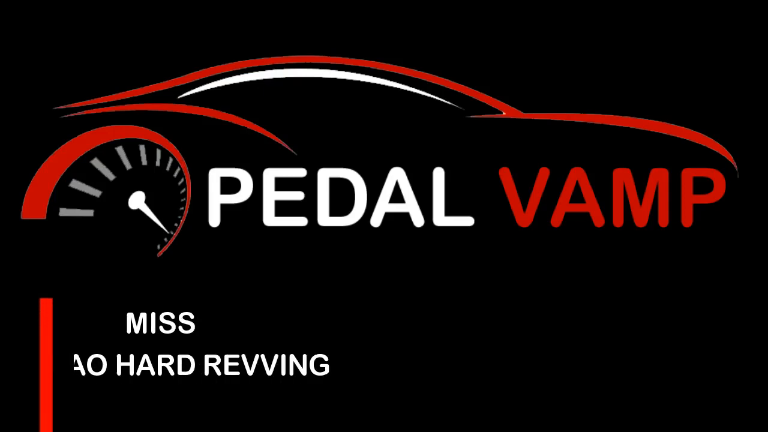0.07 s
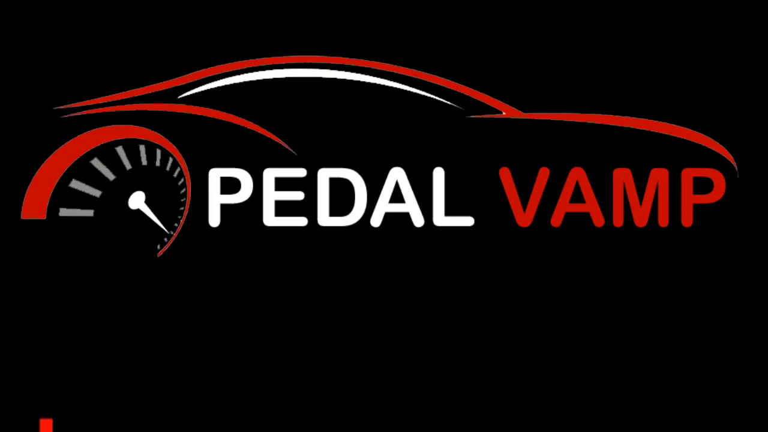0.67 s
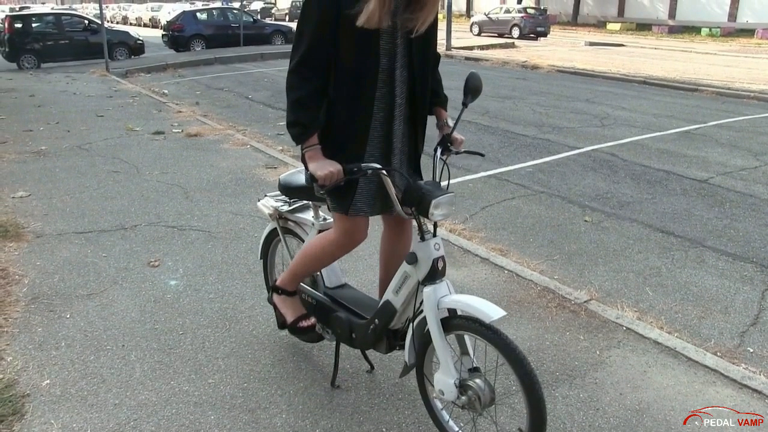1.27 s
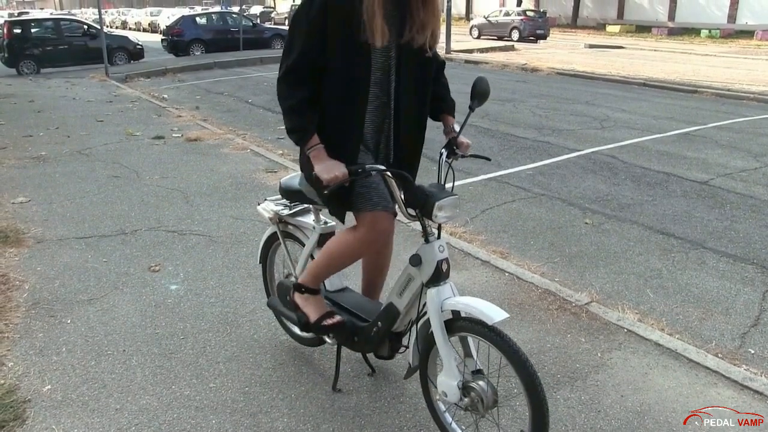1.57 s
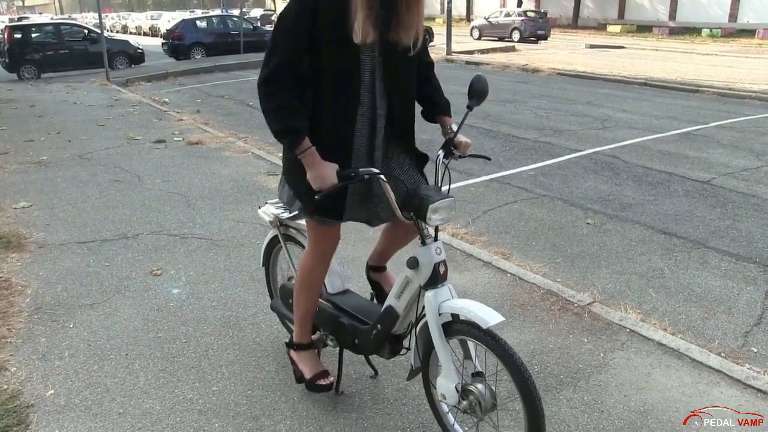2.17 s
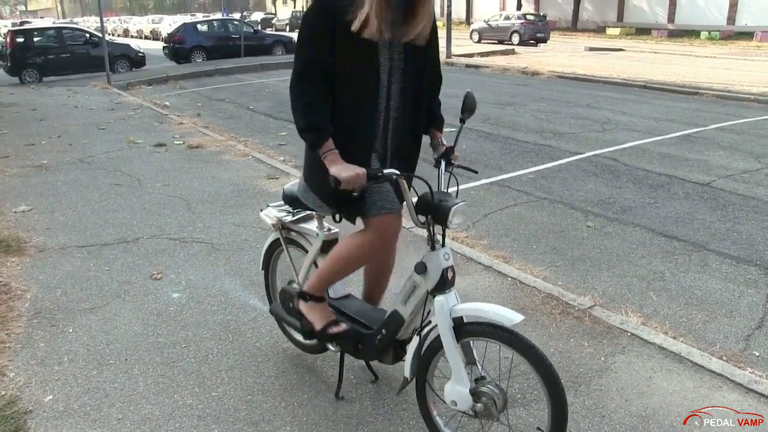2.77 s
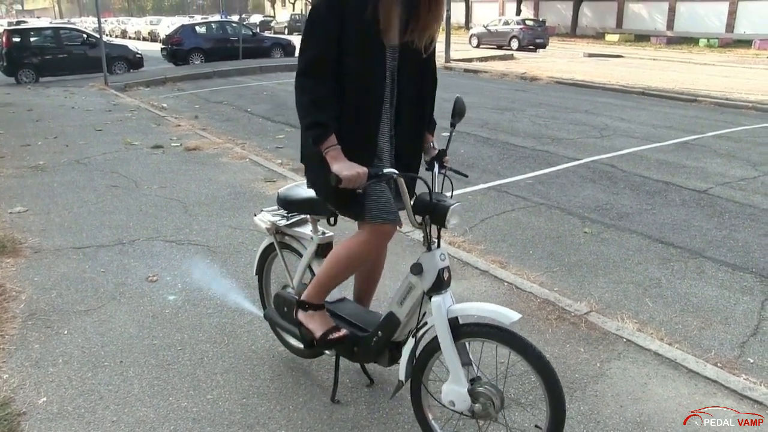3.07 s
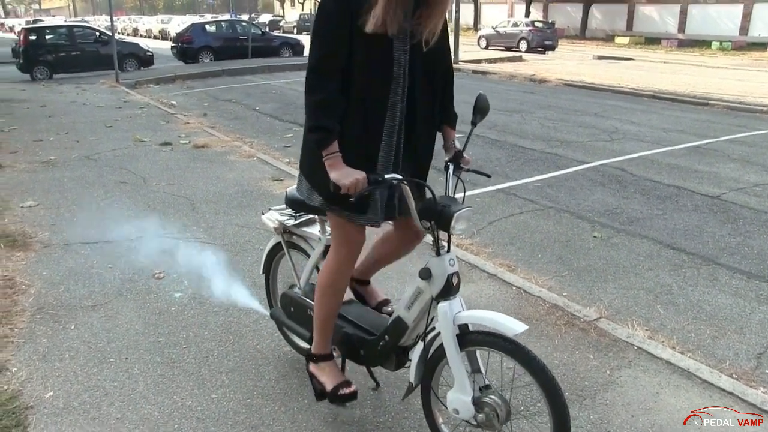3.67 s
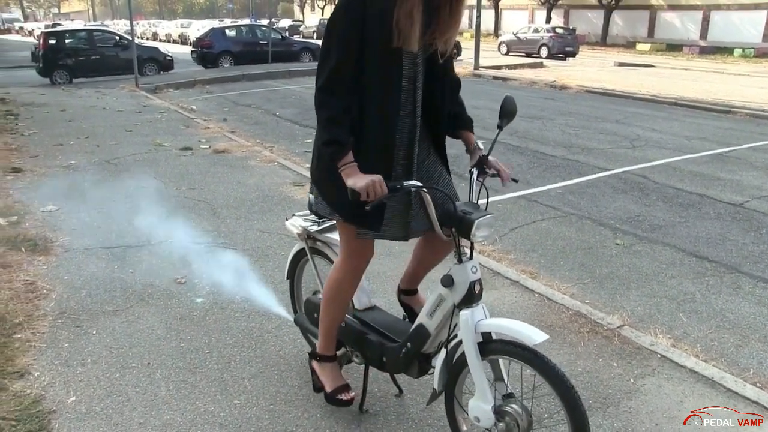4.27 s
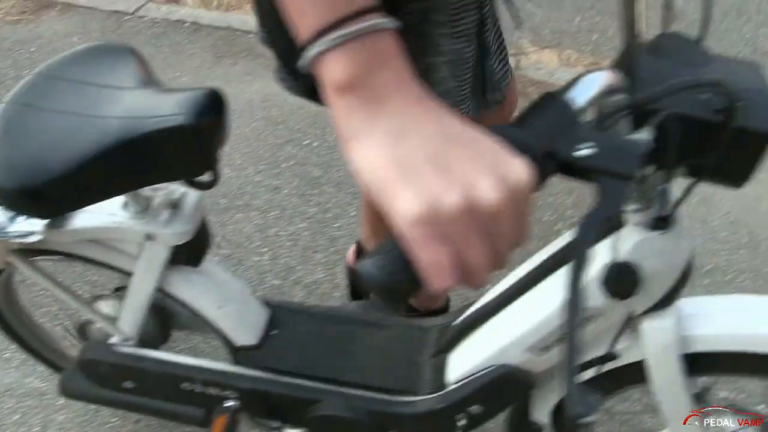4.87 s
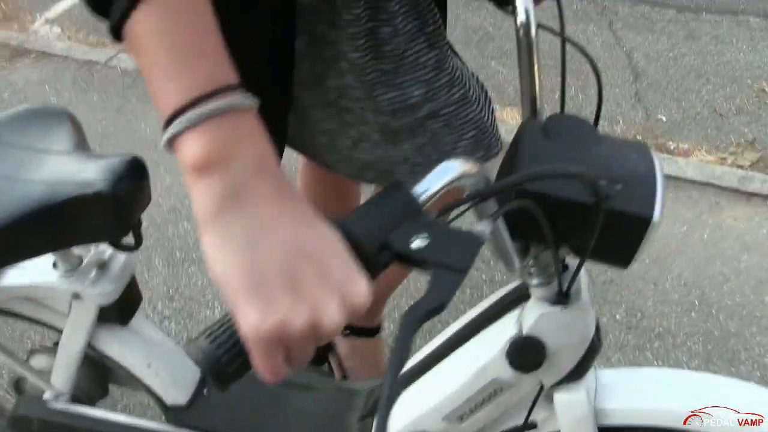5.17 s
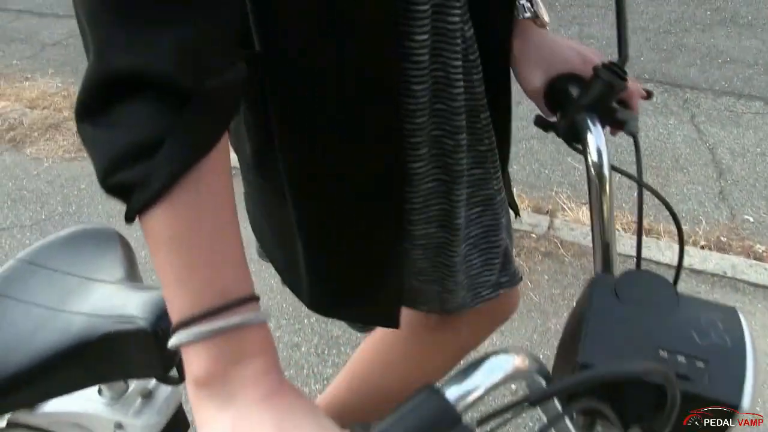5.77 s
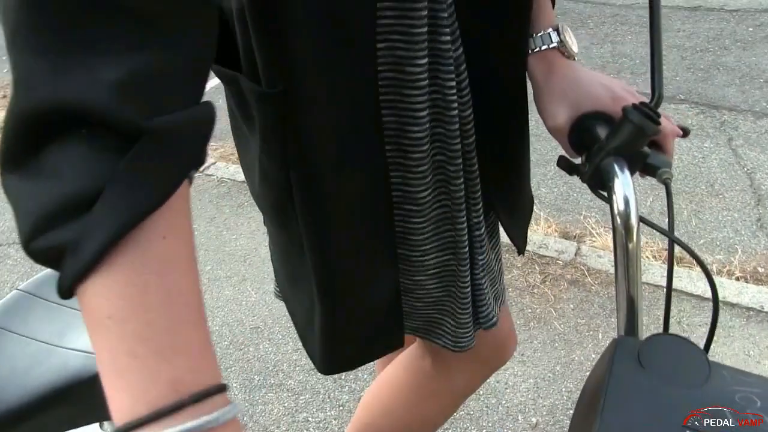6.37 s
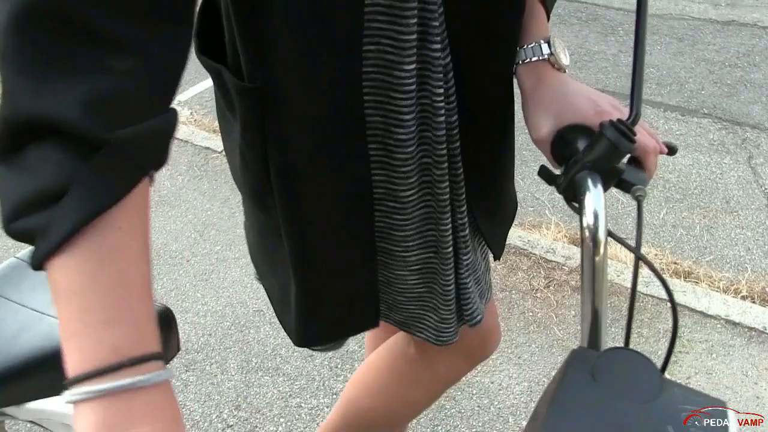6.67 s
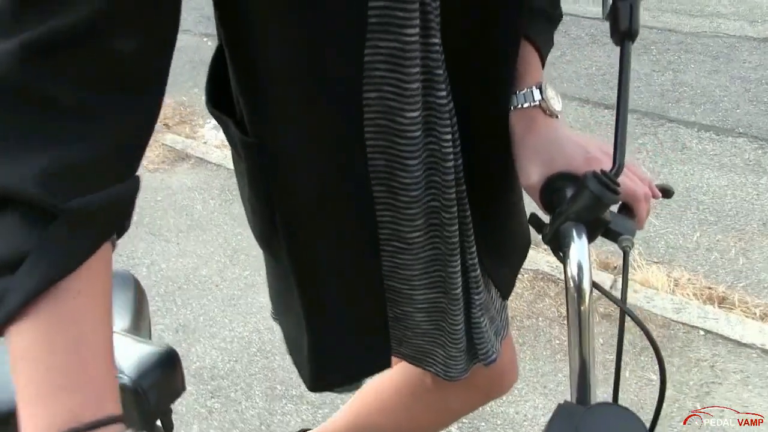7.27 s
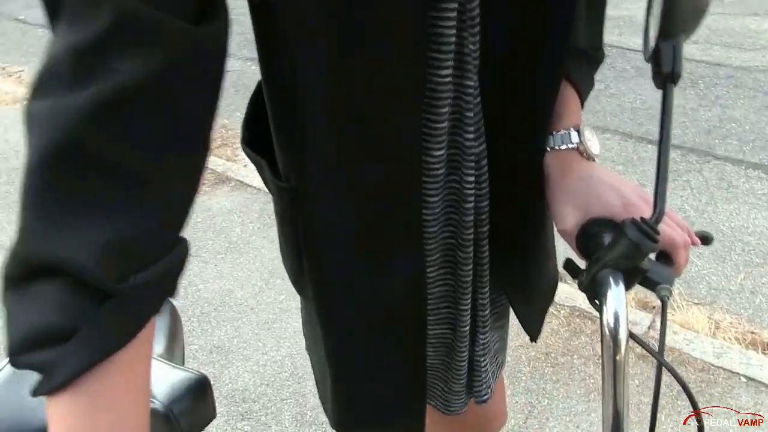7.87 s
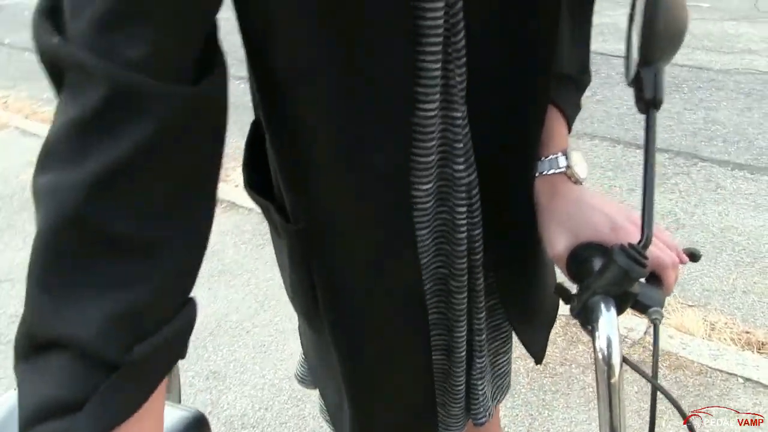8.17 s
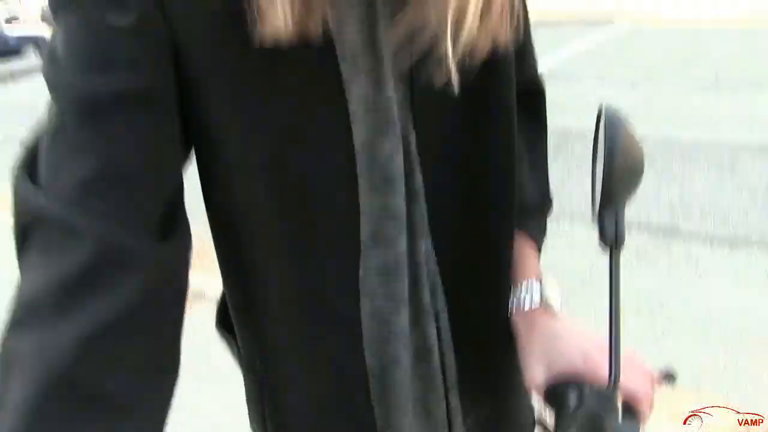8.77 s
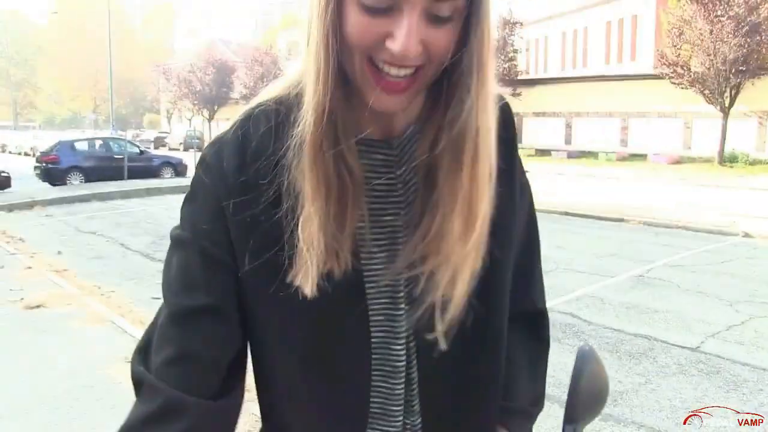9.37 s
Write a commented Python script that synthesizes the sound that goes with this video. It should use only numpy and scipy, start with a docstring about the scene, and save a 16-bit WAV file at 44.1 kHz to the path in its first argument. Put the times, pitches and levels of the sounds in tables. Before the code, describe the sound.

A small moped is pedalled into life and revs loudly, then is heard up close in repeated throttle bursts with rattling bodywork.

```python
"""A quiet roadside, a small two-stroke moped on its stand: a pedal clanks, the engine is cranked,
catches and is held at full throttle. It runs rich, so only every few turns fire hard. Gas pulses boom
in the pipe and bark in the silencer, while the moving parts clatter, whine and ring the metal.
It is heard first from a few steps away, then abruptly from beside the handlebar, where the throttle
is opened again and again and the bodywork rattles."""
import sys
import numpy as np
from scipy import signal
from scipy.fft import rfft, irfft, next_fast_len
from scipy.io import wavfile
from scipy.ndimage import uniform_filter1d

SR = 44100
rng = np.random.default_rng(int(sys.argv[2]) if len(sys.argv) > 2 else 0)


def inscribe(sig):
    """Save sig as 16-bit PCM at rate SR to the path in sys.argv[1].

    A 1-D sig is mono; a 2-D sig holds one channel per row.
    Samples are clipped to [-1, 1] before scaling.
    """
    pcm = np.round(np.clip(np.atleast_2d(sig).T, -1, 1) * 32767)
    wavfile.write(sys.argv[1], SR, pcm.astype(np.int16))


N = 415863
TIME = np.arange(N) / SR

PEDAL_S, PUSH_LENGTH_S = 1.03, .086   # the pedals begin to turn the engine
LIT_S = 1.95   # the engine starts to fire
SHUT_S, SHUT_LENGTH_S = 4.32, .12   # the long rev ends
NEAR_S = 4.58   # the listener jumps to the handlebar

# Throttle blips. Each row: opening and closing in seconds, target speed in turns per second,
# time constant of the pull in seconds, then the lift of boom, bark and knock in dB.
BLIPS = [(4.52, 5.014, 92, 0.23, 5.5, 0, 13.5), (5.476, 5.95, 98, 0.46, 10, 3.5, 13.5),
         (6.412, 6.693, 97.7, .397, 9, 3, -1), (6.828, 7.224, 90.9, 0.046, 8.5, 3.5, 8),
         (7.747, 8.227, 93.2, .089, 12, 3.5, 9), (8.874, 9.278, 96.6, .13, 11.5, 2, 7.5)]
# The bright crack of struck metal. Each row: frequency in Hz, level in dB.
KNOCK_COLOUR = [(300, 2), (900, -16), (2000, 0.5), (3200, 14), (5500, 7.5), (8000, -0.5), (12000, -4.5),
                (16000, -14)]
# The ring of the frame tubes. Each row: frequency in Hz, level in dB, ring time in seconds.
FRAME_MODES = [(750, -7, 0.16), (914, -14, 0.055), (1810, -3, 0.21), (2380, -3, 0.091), (3200, 1, .08)]


def from_db(db):
    """Decibels to gain."""
    return 10 ** (np.asarray(db) / 20)


def ramp(start_s, length_s):
    """A straight rise from 0 to 1."""
    return np.clip((TIME - start_s) / length_s, 0, 1)


def held(opens_s, closes_s, ease_s):
    """Attack, hold and release, half open at the two given times."""
    return ramp(opens_s - ease_s / 2, ease_s) - ramp(closes_s - ease_s / 2, ease_s)


def viewpoint(far, near):
    """A hard cut from a few steps away to the handlebar."""
    close = ramp(NEAR_S, .002)
    return far * (1 - close) + near * close


def at_hz(points, hz):
    """A spectrum read on a log-frequency axis."""
    f, value = np.transpose(points)
    return np.interp(np.log(hz + 1), np.log(f), value)


def cut(x, edge_hz, kind, order=2):
    """Butterworth filter."""
    return signal.sosfilt(signal.butter(order, edge_hz, kind, fs=SR, output="sos"), x)


def evened(x, band=None):
    """Hold the running level (within a band, if given) at 1."""
    power = np.atleast_2d(x if band is None else cut(x, band, "band", order=4)) ** 2
    running = uniform_filter1d(uniform_filter1d(power.mean(0), SR // 8), SR // 8)
    return x / np.sqrt(np.abs(running) + 1e-12)


def noise(colour):
    """Stereo noise of rms 1, coloured by (Hz, dB) points and wider towards the treble."""
    # Stereo image. Each row: frequency in Hz, likeness of left and right from 0 to 1.
    likeness = [(100, 0.95), (500, 0.94), (1000, 0.97), (2000, 0.88), (4000, 0.83), (12000, .74)]
    length = next_fast_len(N)
    hz = np.arange(length // 2 + 1) * SR / length
    mid, side = rfft(rng.standard_normal((2, length))) * from_db(at_hz(colour, hz))
    alike = at_hz(likeness, hz)
    x = irfft(np.sqrt(1 + alike) * mid + np.sqrt(1 - alike) * side * [[1], [-1]], length)[:, :N]
    return x / x.std()


def clicks_at(rows):
    """One click for each (seconds, dB) row."""
    s, db = np.transpose(rows)
    clicks = np.zeros(N)
    clicks[np.round(s * SR).astype(int)] = from_db(db)
    return clicks


def strokes(turns, spread_db, jitter_s=0):
    """One click at every whole turn, uneven in strength and time."""
    at = np.flatnonzero(np.diff(np.floor(turns)) > 0)
    strength, late = rng.standard_normal((1000, 2))[:len(at)].T
    at = np.clip(at + np.round(late * jitter_s * SR).astype(int), 0, N - 1)
    clicks = np.zeros(N)
    clicks[at] = from_db(spread_db * np.clip(strength, -2, 2))
    return clicks


def fade(clicks, t60):
    """Each click starts an envelope that falls 60 dB in t60 seconds."""
    return signal.lfilter([1], [1, -from_db(-60 / (t60 * SR))], clicks + 1e-18)


def ring(clicks, modes, spread_db):
    """Struck modes; every click excites each with a strength of its own."""
    out, at = np.zeros((2, N)), np.flatnonzero(clicks)
    for hz, db, t60 in modes:
        r, w = from_db(-60 / (t60 * SR)), 2 * np.pi * hz / SR
        hit_db = db + spread_db * rng.normal(size=len(at)) + 2 * rng.normal(size=(2, len(at)))
        hits = np.full((2, N), 1e-18)
        hits[:, at] = clicks[at] * from_db(hit_db)
        out += signal.lfilter([0, np.sin(w)], [1, -2 * r * np.cos(w), r * r], hits)
    return out


def resonate(x, resonances):
    """Parallel resonances of alternating sign."""
    out = 0
    for k, (hz, width, db) in enumerate(resonances):
        r, w = np.exp(-np.pi * width / SR), 2 * np.pi * hz / SR
        band = signal.lfilter(np.array([1, 0, -1]) * (1 - r * r) / 2, [1, -2 * r * np.cos(w), r * r], x)
        out = out + (-1) ** k * from_db(db) * band
    return out


def street():
    """Distant traffic lays a low, steady bed."""
    # Traffic rumble. Each row: frequency in Hz, level in dB.
    rumble = [(20, -39), (50, -17), (100, -4), (220, -3), (450, -10), (900, -8), (1900, -15), (4000, -34),
              (15000, -55)]
    return from_db(-34.5) * noise(rumble)


def thuds():
    """The side cover bumps on the frame: a short, hollow boom."""
    # Bumps of the cover. Each row: start in seconds, strength in dB.
    bumps = [(5.159, -11.5), (7.372, -11.5), (7.545, -5), (7.76, -10), (7.795, -13), (8.395, -12),
             (8.744, -15)]
    body = noise([(100, -32), (250, -12), (380, -2.5), (620, 4), (800, -4.5), (1200, -24),
                  (4000, -22), (15000, -55)])
    return from_db(-4) * cut(fade(clicks_at(bumps), .18), 90, "low", order=1) * body


def clanks():
    """Pedal and stand knock on the frame: a short crash, a bright tick and the ring of the tubes."""
    # Knocks on the frame. Each row: start in seconds, strength in dB, lift of the tick in dB.
    knocks = [(0.794, -14, -8), (0.866, -9.5, -26), (0.882, -8, -35), (0.898, -27, -36),
              (1.146, -13.5, -24), (1.237, -18, -5), (1.339, -18, 2), (1.46, -17, -20), (1.539, -14, -12),
              (1.843, -8.5, -4.5), (1.927, -11, -6), (1.959, -10, 6), (1.974, -14, -20), (2.044, -5, -4),
              (4.581, -5, 3), (5.047, -3.5, -3), (6.409, -5, 1.5), (8.856, -12, 9.5), (8.909, -8, -1)]
    s, db, treble_db = np.transpose(knocks)
    blows, ticks = clicks_at(np.c_[s, db]), clicks_at(np.c_[s, db + treble_db])
    body = noise([(100, -25), (400, -2), (750, 19.5), (2000, 4), (3300, 5.5), (5000, -10), (15000, -30)])
    crash = from_db(-8) * cut(fade(blows, .093), 500, "low", order=1) * body
    tick = from_db(-7) * fade(ticks, .03) * cut(noise(KNOCK_COLOUR), 5000, "high")
    tubes = from_db(-20) * ring(blows, FRAME_MODES, spread_db=2)
    # a small steel part pings as the engine catches
    ping = ring(clicks_at([(2.045, -18.5)]), [(7700, 0, .05)], spread_db=0)
    return crash + tick + tubes + ping


def mudguard(turns, clatter_db):
    """Every few turns the drive binds: it chirps at a pitch set by its speed and shakes the mudguard."""
    # The loose mudguard's ring. Each row: frequency in Hz, level in dB, ring time in seconds.
    modes = [(1381, -1.5, 0.11), (1866, -2, 0.083), (2833, -7.5, 0.06), (4520, -10, 0.075)]
    # Its loudest slaps. Each row: start in seconds, strength in dB.
    slaps = [(5.0866, -15), (5.185, -14.5), (5.7983, -18), (6.131, -14), (6.8293, -14.5), (6.9192, -15),
             (6.9965, -13), (7.255, -20), (7.3422, -15.5), (7.425, -14)]
    turns_per_bind, one_bind_s = 7.53, 6.752
    binds = (turns - turns[int(one_bind_s * SR)]) / turns_per_bind
    taps = strokes(binds, spread_db=1.5, jitter_s=.003) * from_db(clatter_db + viewpoint(-8, -.5))
    chirp = cut(fade(taps, .13), 70, "low", order=1) * np.sin(2 * np.pi * 15.4 * turns)
    return from_db(1.5) * chirp + ring(taps + clicks_at(slaps), modes, spread_db=1.5)


def whine(turns, speed):
    """Under load the drive sings on high multiples of the crankshaft speed, fluttering in level."""
    # The drive's partials: multiples of the crankshaft speed, then their balance in dB, far and near.
    orders = (11, 13, 18, 23, 27, 32, 36)
    far_partials_db = (-22, -8, -24, -15, 0.5, 2.5, 0.5)
    near_partials_db = (4.5, -1.5, -1, -10, 3, -14, -23)
    flutter = cut(rng.standard_normal((len(orders), N)), 26, "low")
    partials = np.sin(2 * np.pi * np.outer(orders, turns)) * from_db(3 * flutter / flutter.std())
    engaged = np.clip((speed - 65) / 17, 0, 1) * (1 - ramp(SHUT_S, SHUT_LENGTH_S))
    far = engaged * from_db(-34) * (from_db(far_partials_db) @ partials)
    near_db = -42.5 + 2.2 * np.maximum(speed - 88.6, 0)   # swells above 88.6 turns per second
    return viewpoint(far, from_db(near_db) * (from_db(near_partials_db) @ partials))


def chuffs(turns):
    """Each unlit compression ends in a puff and a clack of cylinder and frame; the chain rattles."""
    # The cold cylinder's clack. Each row: frequency in Hz, level in dB, ring time in seconds.
    cylinder = [(3030, 0, .05), (3230, -1.5, 0.064), (3370, -12, .06), (6780, -12, .04),
                (10960, -13.5, .04), (12400, -22, .05)]
    chain_per_s = 41
    pedalling = ramp(PEDAL_S - PUSH_LENGTH_S / 2, PUSH_LENGTH_S + .1) * (TIME < LIT_S)
    compressions = strokes(turns, spread_db=1) * pedalling * from_db(-23)
    chain = (rng.random(N) < chain_per_s / SR) * from_db(-53 + 4 * rng.standard_normal(N)) * pedalling
    air = noise([(300, -17), (900, 11.5), (1800, 8), (2500, 3), (3250, 6), (4200, 0), (6800, .5),
                 (9000, -17), (12000, -10), (16000, -33)])
    puff = from_db(-3) * cut(fade(compressions, .06), 120, "low", order=1) * air
    clack = from_db(-6.5) * ring(compressions, cylinder, spread_db=2.5)
    return puff + clack + ring(from_db(-15) * compressions + chain, FRAME_MODES, spread_db=4.5)


def firing(turns):
    """Which turns fire hard, the gain of each turn, and the strength of the intake pulse."""
    # The misfiring rhythm. Each row: start in seconds, turns per hard firing, its accent in dB,
    # intake pulse as a share of a plain exhaust pulse.
    misfiring = [(0, 1, 0, .75), (2.38, 4, 8, .05), (3.3, 4, 8.5, .35), (4.58, 2, 2.5, .3)]
    since, every, accent_db, intake = np.transpose(misfiring)
    row = np.searchsorted(since, TIME, "right") - 1
    hard = np.round(turns) % every[row] == 0
    return hard, from_db(accent_db[row] * hard), intake[row]


def knock(turns, speed, knock_db):
    """Hard firings crack through the cylinder and ring its cooling fins and a thin steel cover."""
    # The ring of fins and cover. Each row: frequency in Hz, level in dB, ring time in seconds.
    fins_far = [(3280, 12.5, 0.07), (6750, 7, 0.022), (9550, 5.5, 0.091), (11000, 9, 0.017)]
    fins_near = [(3317, 2.5, 0.063), (6540, 2, 0.02), (9460, -8, 0.035), (11950, -4, 0.014),
                 (14300, -8, 0.012)]
    cover_modes = [(5790, 5.5, 0.091)]
    hard, _, _ = firing(turns)
    blows = strokes(turns, spread_db=1) * hard
    crack = evened(cut(fade(blows, .046), 140, "low", order=1) * noise(KNOCK_COLOUR))
    fins = viewpoint(evened(ring(blows, fins_far, spread_db=1)),
                     evened(ring(blows, fins_near, spread_db=1.5)))
    # from afar, the cover starts to sing as the speed rises
    cover = ring(blows, cover_modes, spread_db=1) * np.clip((speed - 74) / 14, 0, 1) * viewpoint(1, 0)
    return (TIME > LIT_S) * from_db(knock_db) * (crack + from_db(-4.5) * fins + cover)


def snarl(turns, clatter_db):
    """Every firing rings the crankcase and the silencer shell: a pitched, metallic rasp."""
    # Each row: frequency in Hz, level in dB, ring time in seconds.
    shell = [(1416, -2, .018), (1767, 5, .015), (2100, -2.5, .027), (2605, 3, .013),
             (2965, 1, .023), (3425, -3, .021), (3760, -9.5, .0097)]
    blows = strokes(turns, spread_db=1.5) + .85 * strokes(turns + .4, spread_db=2)
    rasp = evened(cut(ring(blows, shell, spread_db=2), 900, "high"))
    return rasp * from_db(clatter_db + viewpoint(-5.5, -8)) * ramp(LIT_S, .15)


def clatter(turns, clatter_db):
    """Piston, belt drive and loose parts slap in every turn and merge into a beating rush."""
    # The clatter's tone while cranking, then running, far and near. Each row: frequency in Hz, level in dB.
    crank_colour = [(24, -43), (40, -5.5), (162, 1.5), (335, -5), (488, -21), (582, -12.5), (846, -6),
                    (1540, -14.5), (2190, -11), (2610, -17.5), (3190, -14.5), (3990, -21.5), (8890, -33.5),
                    (12000, -42), (15800, -55)]
    far_colour = [(24, -68), (40, -34), (96, 1), (130, -3), (203, 1), (344, -5.5), (453, -4.5), (611, -7.5),
                  (805, -2), (1260, -13), (2670, -13.5), (4760, -24), (5960, -24), (11100, -35),
                  (15800, -46)]
    near_colour = [(24, -67), (40, -37), (81, -13), (133, -58), (171, 2.5), (296, 2), (362, -4), (400, 0.5),
                   (526, 2.5), (1110, -6), (1360, -6.5), (1580, -9), (3350, -12.5), (12000, -32.5),
                   (15800, -46)]
    loose_per_s = 190
    caught = ramp(LIT_S, .29)
    slaps = strokes(turns, spread_db=.5, jitter_s=.00033)
    slaps += 1.46 * strokes(turns + .5, spread_db=3.5, jitter_s=.00058)
    loose = (rng.random(N) < loose_per_s / SR) * from_db(2.2 * rng.standard_normal(N))
    power = cut(fade(caught * slaps ** 2 + .56 * loose ** 2, .059), 190, "low", order=1)
    beat = np.sqrt(np.abs(power) + .27 + .42 * (1 - caught))
    cranking = cut(noise(crank_colour), 140, "high", order=1)
    far = cut(noise(far_colour), 1500, "high", order=1)
    near = cut(noise(near_colour), 1200, "high", order=1)
    rush = evened(beat * viewpoint(cranking * (1 - caught) + far * caught, near), band=(1500, 5000))
    return rush * from_db(clatter_db + viewpoint(-2.46, -1.38)) * from_db([[.8], [-.8]])


def gas_pulses(turns, spread_db, rough, jitter_s=0):
    """Exhaust and intake ports open half a turn apart: pressure pulses trailed by puffs of turbulence."""
    _, accent, intake = firing(turns)
    pulses = strokes(turns, spread_db, jitter_s) * accent
    pulses += strokes(turns + .5, spread_db, jitter_s) * intake
    puffs = fade(pulses, .063) * rng.standard_normal(N)
    return pulses / pulses.std() + rough * puffs / puffs.std()


def exhaust(turns, throttle, boom_db, bark_db):
    """Pulses boom in the pipe and bark in the silencer can; an unlit engine only puffs."""
    # Resonances of pipe and silencer, far and near. Each row: frequency in Hz, width in Hz, level in dB.
    pipe_far = [(104.6, 17, -12), (189, 70, -0.5), (230.8, 86, 2.5), (278.4, 72.5, 0), (376.6, 41, -6)]
    pipe_near = [(86.5, 19, -18), (174.7, 33, -0.5), (261, 107, -1.5), (362, 60, 5.5), (416, 19, 2.5),
                 (457, 22, 3.5)]
    silencer_far = [(673, 50, -4), (802.4, 36, 5.5), (900, 44, 6), (960, 58, 2.5), (1140, 85, -6.5)]
    silencer_near = [(499, 55, 4.5), (623.5, 35.4, 5.5), (790, 39, 3.5), (997, 66, -3.5), (1230, 49, -34)]
    unlit = 1 - ramp(LIT_S, .1)
    # with the throttle shut the firing turns ragged
    coasting = np.clip((-18 - boom_db) / 12, 0, 1)
    pipe_rough = viewpoint(.07 + .2 * coasting, .17 + .4 * coasting) + unlit
    can_rough = viewpoint(.16, .45 - .19 * throttle) + unlit
    pipe_gas = gas_pulses(turns, spread_db=.7, rough=pipe_rough)
    can_gas = gas_pulses(turns, spread_db=1.1, rough=can_rough, jitter_s=.00005)
    # close by, a shut throttle starves the two lowest pipe resonances
    drone = resonate(pipe_gas, pipe_near[:2]) * from_db(-7.5 * (1 - throttle))
    pipe = viewpoint(evened(resonate(pipe_gas, pipe_far)),
                     evened(drone + resonate(pipe_gas, pipe_near[2:])))
    can = viewpoint(evened(resonate(can_gas, silencer_far)), evened(resonate(can_gas, silencer_near)))
    boom = from_db(boom_db + viewpoint(-.38, -.2)) * cut(pipe, 71, "high") * from_db([[.55], [-.55]])
    bark = from_db(bark_db + viewpoint(-1.9, -.98)) * can * from_db([[-.4], [.4]])
    return boom + bark


def crank_speed(grips):
    """After the long rev, each blip pulls the speed towards its aim; friction drags it down between."""
    # The crankshaft while pedalled, checked by the first compression, then through the long rev.
    # Each row: time in seconds, speed in turns per second.
    cranking = [(1.13, 28.4), (1.15, 12.8), (1.26, 19.2), (1.55, 16.6), (1.68, 16.8), (1.8, 24), (1.95, 30),
                (2.1, 49)]
    long_rev = [(2.3, 71.6), (2.34, 76.0), (2.45, 81.8), (2.6, 81.5), (2.66, 84.4), (3.2, 96.6),
                (3.66, 106.2), (4.28, 114.8), (4.35, 111.8), (4.58, 84.4)]
    lag_s, coast_turns_per_s2 = .043, 20.3
    _, _, aim, pull_s, *_ = np.transpose(BLIPS)
    start_up = np.interp(TIME, *np.transpose(list(cranking) + list(long_rev)))
    steps = np.arange(int(NEAR_S * SR), N, SR // 500)
    speeds = [start_up[-1]]
    for grip, dt in zip(grips.T[steps], np.diff(steps) / SR):
        pull = grip @ ((aim - speeds[-1]) / pull_s)
        drag = coast_turns_per_s2 * (1 - grip.sum())
        speeds.append(speeds[-1] + dt * (pull - drag))
    change = np.interp(TIME, steps / SR, speeds) - start_up[-1]
    r = np.exp(-1 / (lag_s * SR))   # the engine lags behind the grip
    return start_up + signal.lfilter([1 - r], [1, -r], change)


def loudness(speed, grips):
    """Faders for boom, bark, clatter and knock: they ride from state to state, then answer each blip."""
    # The mix in each state of the engine. Each row: boom, bark, clatter and knock in dB.
    resting = (-39, -46, -39.5, -45)
    pedalling = (-35, -34, -34, -39)
    revving = (-18.5, -16.5, -17.5, -30.5)
    running_down = (-23, -21.5, -19.5, -36)
    coasting = (-28.5, -21, -19.5, -38)
    # The change in those four, in dB, where the speed suits the pipe in the long rev.
    tuned = (2.5, -1.5, -1.5, 3)
    resting, pedalling, revving, running_down, coasting, tuned = np.array(
        [resting, pedalling, revving, running_down, coasting, tuned])[:, :, None]
    catch_s, catch_lengths_s = 1.932, np.array([[.16], [.19], [.24], [.15]])
    on_pipe = np.exp(-((speed - 86.3) / 17) ** 2)   # peaks at 86.3 turns per second
    pedalling = pedalling + 3 * ramp(PEDAL_S, catch_s - PEDAL_S)   # the rider pushes ever harder
    far = (resting + (pedalling - resting) * ramp(PEDAL_S, PUSH_LENGTH_S)
           + (revving - pedalling) * ramp(catch_s, catch_lengths_s)
           + (running_down - revving) * ramp(SHUT_S, SHUT_LENGTH_S) + tuned * on_pipe)
    opens, closes, _, _, boom_db, bark_db, knock_db = np.transpose(BLIPS)
    # the sound swells a little ahead of each pull and outlasts it
    swells = np.array([held(a - .084, b + .03, ease_s=.14) for a, b in zip(opens, closes)])
    boom_lift = (boom_db[:, None] * swells).max(axis=0)
    lift = np.array([boom_lift, bark_db @ swells, .6 * swells.max(axis=0), knock_db @ grips])
    return viewpoint(far, coasting + lift)


def scene():
    """The throttle sets speed and loudness; the crankshaft drives the engine, over a quiet street."""
    grips = np.array([held(opens, closes, ease_s=.1) for opens, closes, *_ in BLIPS])
    speed = crank_speed(grips)
    turns = np.cumsum(speed) / SR
    turns -= turns[int(PEDAL_S * SR)]
    boom_db, bark_db, clatter_db, knock_db = loudness(speed, grips)
    engine = (exhaust(turns, grips.sum(axis=0), boom_db, bark_db) + snarl(turns, clatter_db)
              + clatter(turns, clatter_db) + knock(turns, speed, knock_db) + chuffs(turns))
    bodywork = mudguard(turns, clatter_db) + clanks() + thuds()
    return engine + bodywork + whine(turns, speed) + street()


def record(dry):
    """The sound cuts in abruptly; the highest peaks are rounded and the top is cut."""
    start_s, ceiling, cutoff_hz = .779, .95, 15900
    live = dry * ramp(start_s, .001)
    rounded = live / (1 + (live / ceiling) ** 4) ** (1 / 4)
    return signal.sosfilt(signal.ellip(10, .1, 80, cutoff_hz, fs=SR, output="sos"), rounded)


dry = scene()
out = record(dry)
inscribe(out)
```